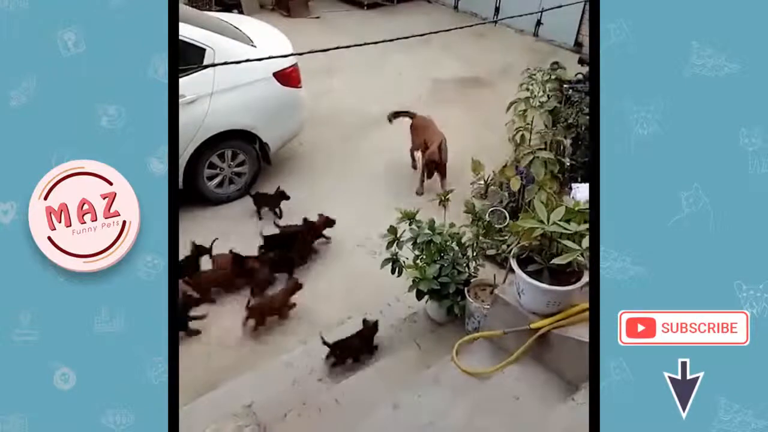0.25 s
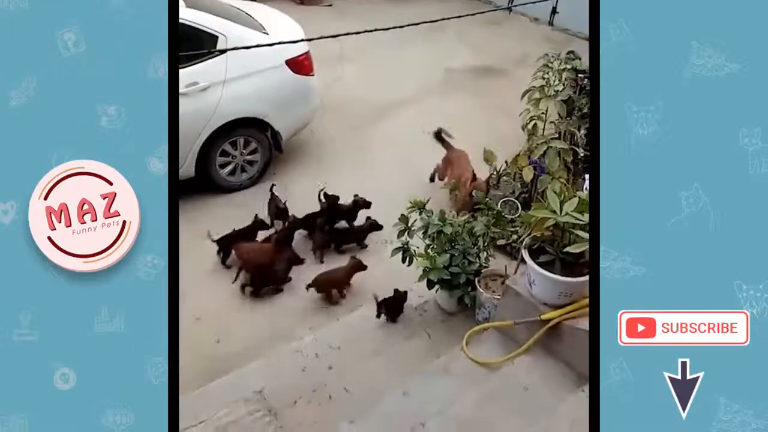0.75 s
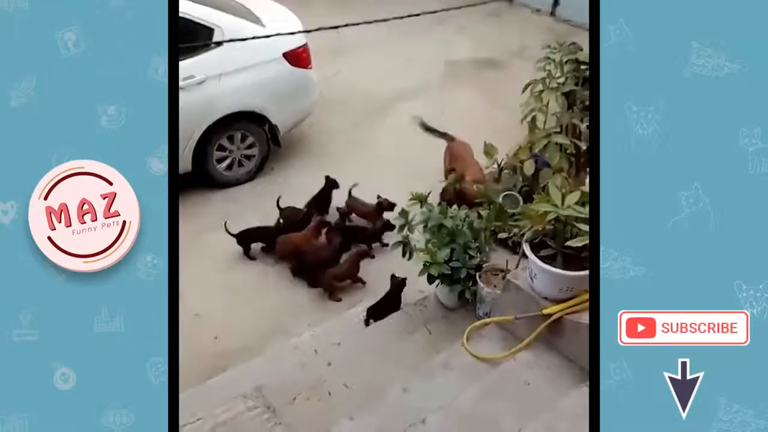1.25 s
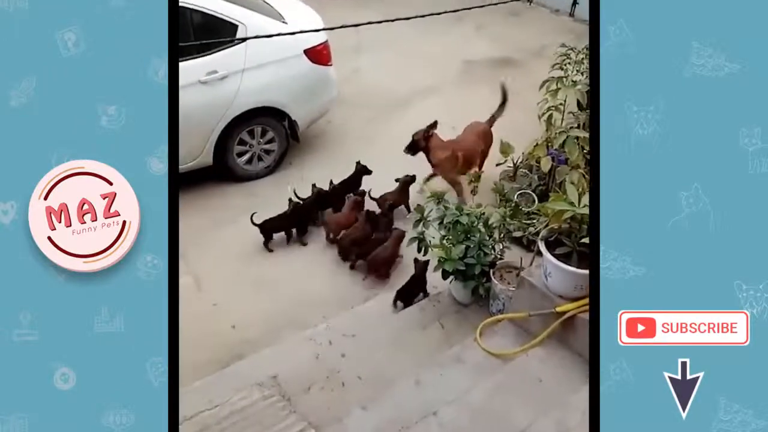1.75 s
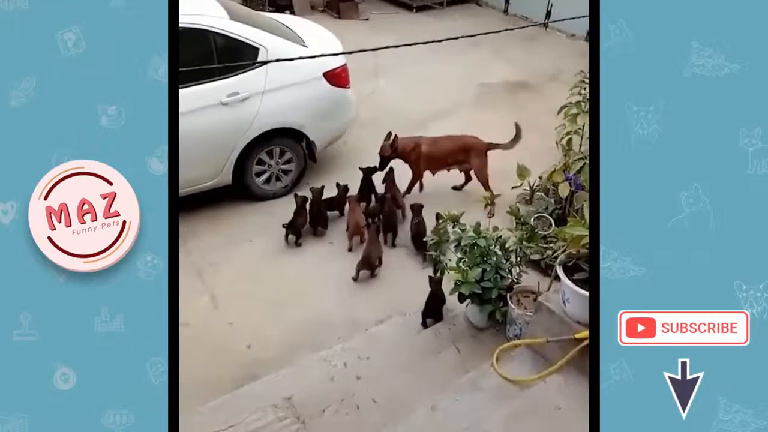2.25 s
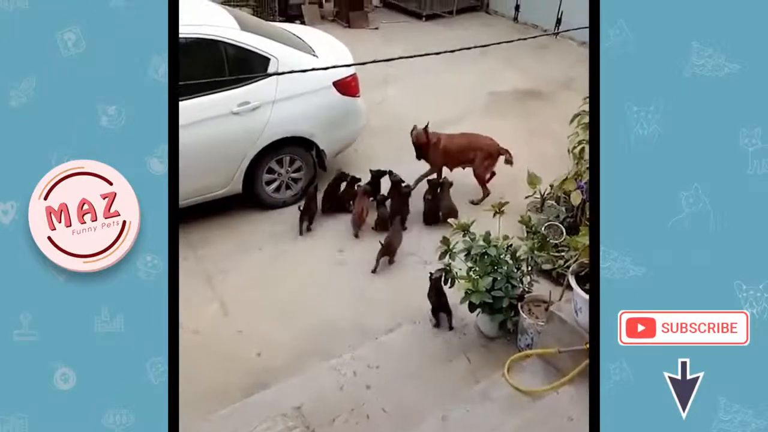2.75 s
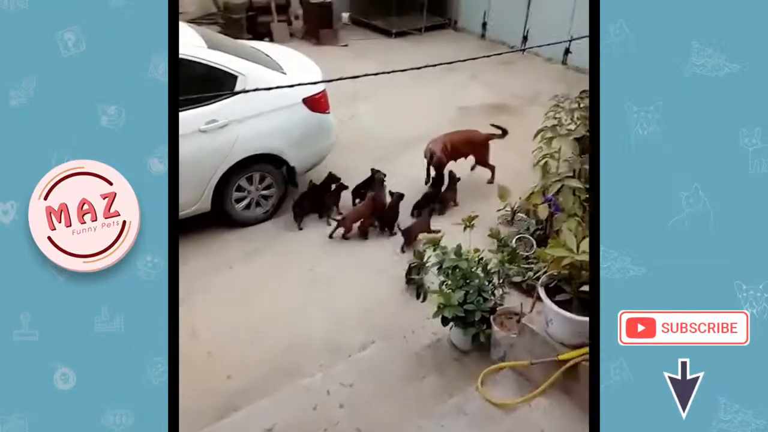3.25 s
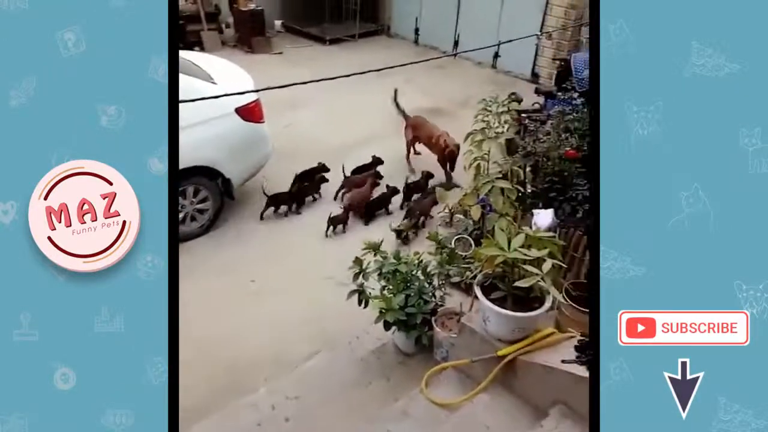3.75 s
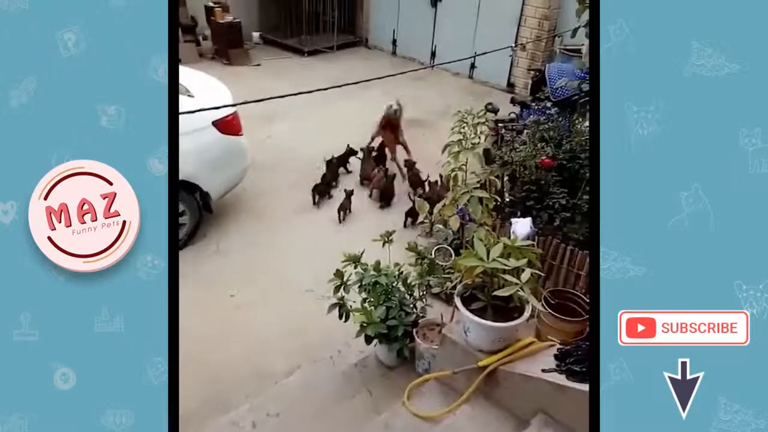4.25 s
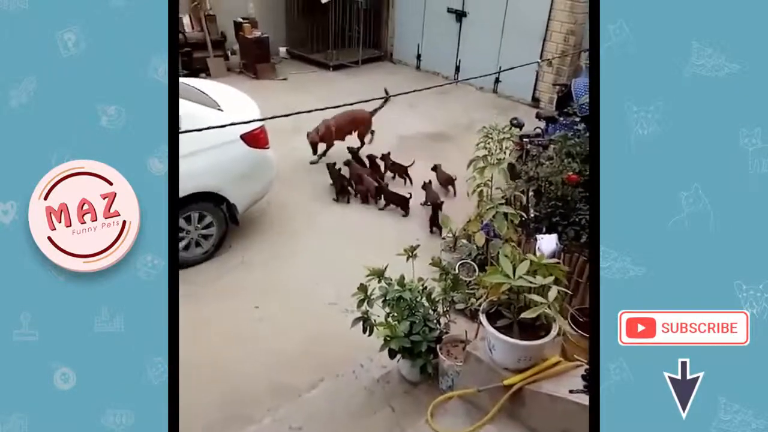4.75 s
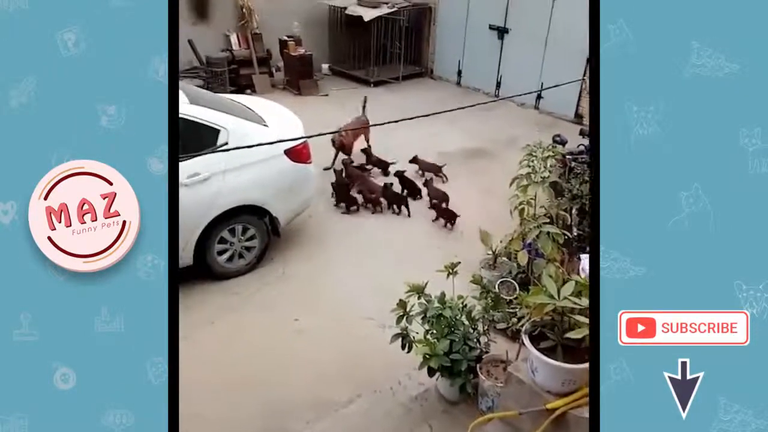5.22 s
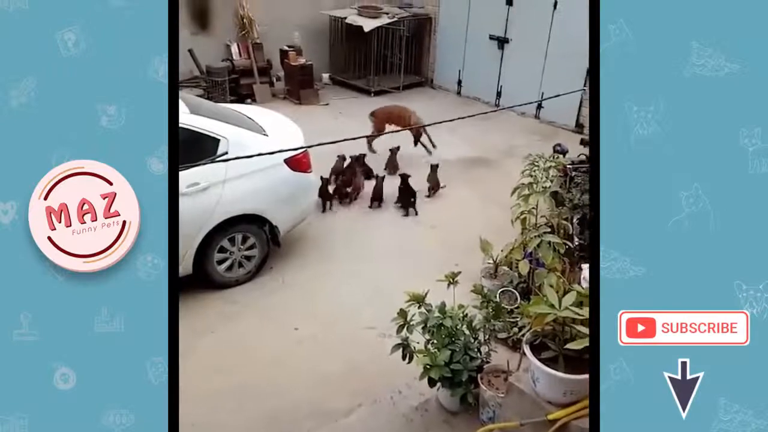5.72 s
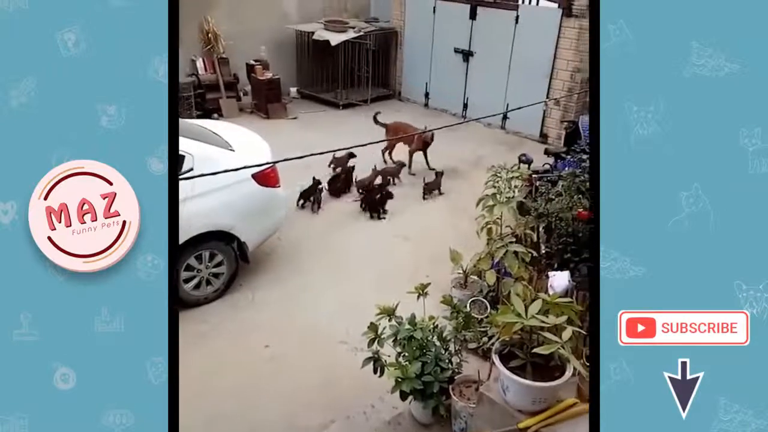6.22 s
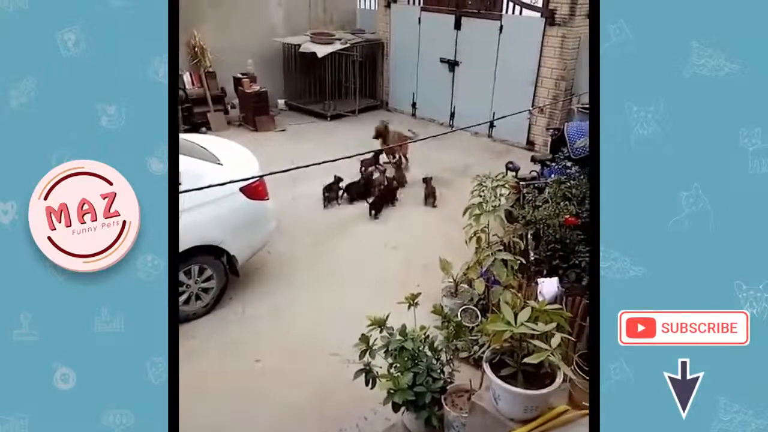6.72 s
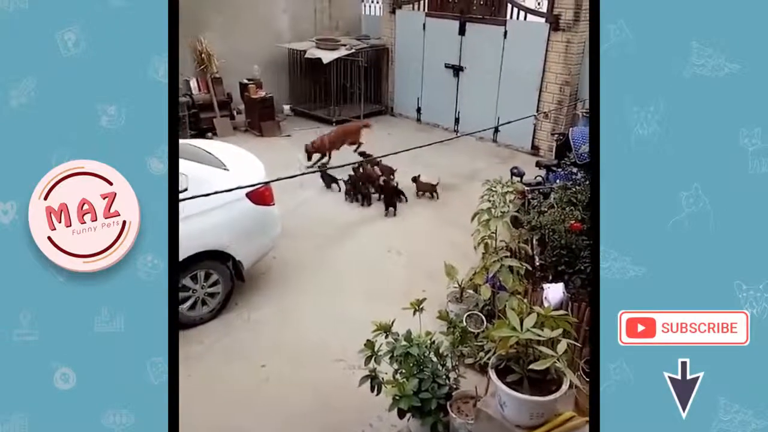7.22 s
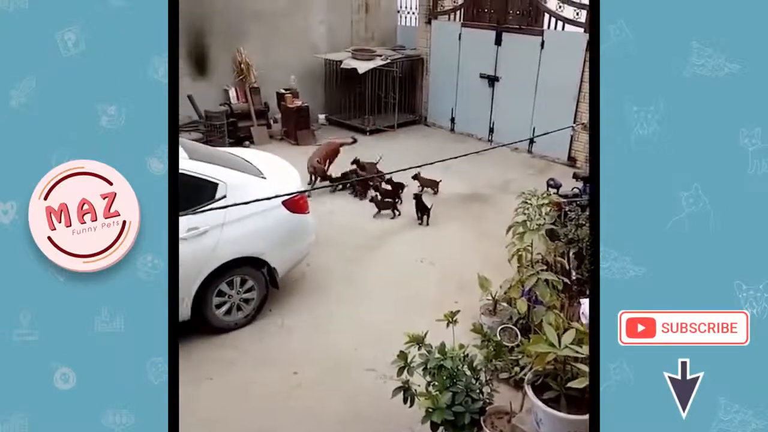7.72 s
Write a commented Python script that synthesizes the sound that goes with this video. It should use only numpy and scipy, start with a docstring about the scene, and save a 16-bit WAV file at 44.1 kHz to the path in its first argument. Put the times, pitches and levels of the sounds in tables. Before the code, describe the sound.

A litter of puppies yelps, whines and barks hoarsely in an overlapping chorus in a walled concrete yard, with wind thumps at the start.

```python
"""A litter of puppies crowds its mother in a walled concrete yard: hoarse barks start as a clean rising
chirp, then roughen with pitch jitter, a slower beat and breath noise. Clear open-mouthed yelps, closed-mouth
whines and thin whistling squeaks overlap as gliding tones; the mother hums low. More pups call behind them.
The walls answer with a short noise tail, wind noise and slaps thump the phone's microphone, hardest at
the start, and a faint hiss of yard air runs throughout."""
import sys
import numpy as np
from scipy import signal
from scipy.fft import rfft, irfft, next_fast_len
from scipy.io import wavfile
from scipy.ndimage import uniform_filter1d, minimum_filter1d, map_coordinates

SR = 44100
rng = np.random.default_rng(int(sys.argv[2]) if len(sys.argv) > 2 else 0)


def inscribe(sig):
    """Save sig as 16-bit PCM at rate SR to the path in sys.argv[1].

    A 1-D sig is mono; a 2-D sig holds one channel per row.
    Samples are clipped to [-1, 1] before scaling.
    """
    pcm = np.round(np.clip(np.atleast_2d(sig).T, -1, 1) * 32767)
    wavfile.write(sys.argv[1], SR, pcm.astype(np.int16))


def level_to_linear(level):
    """Convert decibel levels to linear amplitude factors, elementwise."""
    exponent = np.asarray(level, float) / 20
    return 10 ** exponent


N = 351477  # samples in the scene

# Voices: level_db is ahead of the mouth, throat and yard; brightness_db is treble tilt [dB per two octaves].
# hoarse barks: start_s, length_s, held_pitch_hz, level_db, hoarseness [no unit], brightness_db
BARK_CALLS = [(-.06, 0.083, 1085, -11, 0.87, 2), (0.601, 0.11, 1163, -23.5, 0.93, -0.5),
              (1.267, 0.11, 851, -15, 0.9, 0.5), (1.679, 0.11, 875.5, -18, 0.91, 0),
              (1.943, 0.089, 1053, -15, 1.4, 2.5), (2.144, 0.097, 1071, -19, 1, 2),
              (2.349, 0.11, 1000, -18.5, 1.2, 3.5), (2.521, 0.065, 1010, -23, 1.1, -4.5),
              (2.781, 0.1, 986, -18, .85, 3.5), (3.04, 0.1, 989, -21.5, 0.77, 3.5),
              (3.285, 0.11, 1021, -16.5, 1.185, 2), (3.519, 0.11, 1048, -16.5, 1.2, 2),
              (3.717, 0.11, 1033, -19.5, 1.1, 3.5), (4.043, 0.094, 976.1, -19, 0.78, 2),
              (4.22, 0.08, 1047, -21.5, 1.1, 4), (4.556, 0.1, 942, -24, 0.71, 4),
              (4.664, 0.111, 918, -21.5, 1.2, 1.5), (4.874, 0.11, 1075, -21.5, .7, 1),
              (5.079, 0.11, 1054, -19.5, 1.2, 3.5), (5.31, 0.1, 1097, -18, 1.1, 1),
              (5.524, 0.12, 984, -19.5, 0.77, 3.5), (5.714, 0.099, 1035, -16.5, 1.3, 0),
              (5.988, 0.13, 994, -19.5, .85, 2), (6.395, 0.2, 977, -20, 1, 2),
              (6.814, 0.12, 963, -22.5, 0.71, 1.5), (6.932, 0.16, 968, -20.5, 1, 1),
              (7.26, 0.094, 1164, -20.5, 0.75, 2), (7.437, 0.11, 1196, -17, 1.3, 2.5),
              (7.749, 0.1, 1076, -20.5, 0.69, 1), (7.905, 0.0754, 1086, -19, 1.2, 4.5)]
# closed-mouth whines: start_s, length_s, first_pitch_hz, last_pitch_hz, level_db
WHINE_CALLS = [(0, 0.037, 1321, 1266, -20.5), (0, 0.06, 958, 1190, -26), (.095, 0.07, 1438, 1241, -22.5),
               (.252, 0.014, 2130, 2130, -25.5), (.548, 0.058, 1760, 1927, -19),
               (.64, 0.08, 1954, 1813, -28.5), (.607, 0.078, 1202, 1096, -18),
               (.94, 0.021, 1193, 1109, -14), (1.01, 0.086, 1179, 929, -20.5),
               (1.39, 0.13, 1361, 1057, -16), (1.785, 0.06, 1186, 1238, -19.5),
               (1.9, 0.17, 1260, 1400, -29), (1.96, 0.038, 1049, 1068, -25.5),
               (2.01, 0.1514, 1262, 1330, -24), (2.225, 0.088, 1329, 1192, -14.5),
               (2.37, 0.1245, 1040, 1374, -20.5), (2.56, 0.29, 1484, 1251, -20),
               (2.61, 0.085, 1290, 1186, -26), (2.8, 0.094, 1007, 1317, -21.5),
               (2.92, 0.044, 1291, 1319, -20), (3, 0.1, 1222, 1049, -26.5),
               (3.03, 0.069, 1353, 1440, -26.5), (3.16, 0.11, 1254, 1158, -21.5),
               (3.36, 0.1, 1182, 1358, -20), (3.54, 0.2035, 1098, 1270, -25),
               (3.62, 0.09, 1293, 1475, -30.5), (3.74, 0.15, 1007, 1168, -26),
               (4.24, 0.0886, 1039, 1197, -22), (4.41, 0.049, 1032, 1240, -23.5),
               (4.515, 0.065, 1484, 1297, -28.5), (4.71, 0.0935, 1085, 1172, -26.5),
               (4.905, 0.088, 1013, 1134, -28.5), (4.95, 0.0332, 1370, 1316, -24),
               (5.18, 0.054, 1140, 1173, -25.5), (5.2, 0.068, 1415, 1376, -31.5),
               (5.32, 0.096, 1040, 1197, -23), (5.395, 0.12, 1263, 1219, -20.5),
               (5.74, 0.18, 1106, 1324, -25), (5.92, 0.15, 1469, 1256, -26),
               (6.32, 0.076, 1307, 1297, -32.5), (6.5, 0.1566, 1043, 1236, -31),
               (6.835, 0.25, 1177, 1350, -24.5), (7.02, 0.038, 1184, 1422, -18),
               (7.275, 0.079, 1080, 1278, -30), (7.385, 0.059, 1316, 1318, -20.5)]
# clear open-mouthed yelps: start_s, length_s, first_pitch_hz, last_pitch_hz, level_db, brightness_db
YELP_CALLS = [(.05, 0.053, 1203, 1393, -26.5, 1), (.105, 0.067, 1423, 1226, -23, 3),
              (.33, 0.19, 1015, 827, -40, 4), (.497, .1, 861, 982, -17, 4),
              (.866, .084, 778, 1030, -17, 0.5), (.945, 0.15, 1153, 1025, -29.5, 3),
              (1.4, 0.14, 1308, 1084, -31.5, 1), (1.51, 0.15, 936.7, 957, -24, 14.5),
              (2.04, 0.088, 1358, 1143, -15, 2.5), (2.12, 0.11, 820, 1115, -21, -0.5),
              (2.51, 0.1, 815, 1090, -23, 0), (2.28, 0.08, 1320, 1070, -27.5, -1),
              (2.84, 0.12, 1337, 1224, -23, -0.5), (2.91, 0.099, 900, 1007, -31, -4),
              (3.063, .12, 1090, 1194, -25, -6), (3.17, .105, 1250, 1102, -25, 1),
              (3.46, 0.13, 1075, 1076, -25.5, -2.5), (3.6, 0.063, 1170, 1170, -18.5, 3),
              (3.91, 0.16, 1460, 1480, -47.5, 9.5), (4.08, .13, 960, 1181, -22, 2),
              (4.41, 0.084, 1100, 1141, -24, 0.5), (4.455, 0.0755, 975, 994.6, -26, 0),
              (4.82, 0.098, 1130, 1152, -28.5, 1.5), (4.985, 0.09, 855, 985, -25.5, 1),
              (5.61, 0.067, 1120, 1323, -24, -4), (5.815, 0.083, 1128, 1175, -22, 0),
              (6.12, 0.15, 972, 1065, -33, -2), (6.45, 0.17, 923, 934, -26, 1),
              (6.82, 0.09, 1104, 1198, -24, 4.5), (7, 0.16, 985, 1080, -40, -6.5),
              (7.885, 0.076, 930, 953, -26.5, -4), (7.81, 0.24, 1036, 1217, -35, 0)]
# whistling squeaks: start_s, length_s, first_pitch_hz, last_pitch_hz, level_db
SQUEAK_CALLS = [(.87, 0.041, 10750, 10550, -50), (1.44, 0.2, 7630, 7120, -44),
                (2.22, 0.15, 7300, 7420, -36.5), (2.57, 0.11, 10670, 10070, -45),
                (2.89, 0.055, 11050, 11280, -36.5), (2.99, 0.12, 7900, 7340, -42),
                (3.4, 0.0412, 11000, 11940, -36), (3.41, 0.098, 7960, 7640, -32),
                (3.785, 0.028, 11300, 11500, -42), (4.13, 0.067, 7104, 7240, -35),
                (5, 0.15, 7380, 7130, -42), (5.41, 0.036, 7200, 7450, -34),
                (5.645, 0.029, 11670, 10800, -41.5), (6.5, 0.05, 7200, 7000, -38),
                (5.2, 0.058, 11700, 12670, -46.5), (6.09, 0.08, 11600, 11950, -53.5)]
# the mother's hums: start_s, length_s, first_pitch_hz, last_pitch_hz, level_db
HUM_CALLS = [(3.72, 0.15, 395, 439, -45.5), (6.45, 0.19, 426, 366, -52), (6.71, 0.22, 565, 497, -55)]
# open throat and microphone response: frequency_hz, gain_db
THROAT_AND_MICROPHONE = [(600, -22), (820, -6.5), (1200, 7), (1700, 7), (2300, 3), (2900, 3.5), (3600, 0),
                         (5500, 1.5), (6600, -4), (7400, -21.5), (8300, -57)]
# harmonics of a whine, from the fundamental up: mean level_db
WHINE_HARMONICS_DB = [1, -22, -12.5, -24.5, -30.5]
# reverberation of the walled yard: frequency_hz, decay_s [time to fall 60 dB]
YARD_DECAY = [(800, 0.76), (2000, 0.5804), (6000, 0.44)]
# gusts on the microphone port: peak_s, width_s [between the 1/e points], level_db
WIND_GUSTS = [(0.136, 0.099, -13), (0.371, 0.308, -18), (0.693, 0.051, -35.5), (0.817, 0.078, -16),
              (0.938, 0.2, -24.5), (1.185, 0.12, -27), (1.67, 0.095, -27), (1.846, 0.2, -46),
              (2.153, 0.65, -56.5), (2.804, 0.32, -42.5), (2.92, 0.11, -33.5), (3.149, 0.14, -32.5),
              (3.314, 0.081, -35.5), (4.382, 0.077, -45.5), (4.682, 0.13, -45.5)]
# colour of the wind buffeting: frequency_hz, relative gain_db
WIND_COLOUR = [(15, -65.5), (30, -33), (62, 3.5), (97, 1.5), (151, -4.5), (348, -23.5), (600, -36.5),
               (780, -65.5), (1320, -120)]
# gust slaps: start_s, drive_db [of the ringing, ahead of its rise and decay]
WIND_SLAPS = [(0.069, 6), (0.12, 2.5), (0.166, 15.5), (0.808, 5)]
# colour of the yard hiss: frequency_hz, relative gain_db
AIR_COLOUR = [(30, -11), (120, -3), (700, -7), (1200, -9), (6500, -19), (7800, -40), (11000, -31),
              (13500, -33)]


def unit(x):
    """Scale to rms 1."""
    return x / np.sqrt(np.mean(x ** 2) + 1e-20)


def along(points, hz):
    """Read (Hz, value) points on a log frequency axis."""
    f, v = np.transpose(points)
    return np.interp(np.log(hz + 1), np.log(f + 1), v)


def wobble(rate, size):
    """A smooth random curve through `rate` normal random knots a second."""
    at = np.arange(0, size + 32, 32)  # computed every 32 samples, straight lines between
    knots = rng.standard_normal(int(size * rate / SR) + 4)
    return np.interp(np.arange(size), at, map_coordinates(knots, [at * rate / SR]))


def coloured(x, spectrum):
    """Pass x through the gain of (Hz, dB) points."""
    padded = next_fast_len(N + 8192)
    gain = level_to_linear(along(spectrum, np.fft.rfftfreq(padded, 1 / SR)))
    return irfft(rfft(x, padded) * gain, padded)[:N]


def add(track, s, x):
    """Mix x in at time s, cutting whatever lies outside the track."""
    i = max(round(s * SR), 0)
    x = x[max(-round(s * SR), 0):]
    track[i:i + len(x)] += x[:max(len(track) - i, 0)]


def swell(size, rise_s, fall_s):
    """A breath: smooth rise, hold, smooth fall."""
    t = np.arange(size) / SR
    return np.sin(np.pi / 2 * np.clip(np.minimum(t / rise_s, t[::-1] / fall_s), 0, 1)) ** 2


def mouth(x, brightness_db):
    """A wider mouth lifts the treble and moves its resonance up."""
    resonance_hz, depth_db, width_octaves = 3600, 7, .25
    moved = .17 * brightness_db  # octaves
    octaves = np.log2(np.clip(np.fft.rfftfreq(len(x), 1 / SR), 1500, 6500) / resonance_hz)
    bump = np.exp(-((octaves - moved) / width_octaves) ** 2) - .5
    peak_db = depth_db * bump * (octaves > -1.2)  # leaves the lowest frequencies alone
    return irfft(rfft(x) * level_to_linear(brightness_db * octaves / 2 + peak_db), len(x))


def calls(rows, harmonics_db, arch, shake, shake_rate, flutter_db, rise_s, fall_s):
    """Tonal calls: pitch glides from first to last with a mid-call lift, trembles, and the level flutters.

    arch and shake are shares of the pitch; shake_rate is in knots a second."""
    out = np.zeros(N)
    for s, length, first, last, db, *brightness in rows:
        size = round((length + fall_s / 2) * SR)
        progress = np.minimum(np.arange(size) / SR / length, 1)
        hz = (first + (last - first) * progress) * (1 + arch * np.sin(np.pi * progress))
        phase = 2 * np.pi * np.cumsum(hz * (1 + shake * wobble(shake_rate, size))) / SR
        tone = np.zeros(size)
        for k, harmonic_db in enumerate(harmonics_db):
            spread_db = np.sign(k) * rng.normal(0, 2)  # overtones differ from call to call
            level = level_to_linear(harmonic_db + spread_db + 3.5 * wobble(45, size))
            tone += level * np.sin((k + 1) * phase + k * k)
        voice = mouth(swell(size, rise_s, fall_s) * tone, sum(brightness))
        level = level_to_linear(db + flutter_db * wobble(71.2, size))
        add(out, s, level * np.sqrt(2) * voice)
    return out


def crowd(count, low_hz, high_hz, db):
    """Rows of chance calls, each following a randomly picked bark, from the third bark on, by up to 0.14 s."""
    which, wait, length, pitch, bend, level = rng.random((count, 6)).T
    leaders = np.array(BARK_CALLS[2:])
    start_s = leaders[(which * len(leaders)).astype(int), 0] + .14 * wait
    top = low_hz + (high_hz - low_hz) * pitch
    first_hz = top * (.8 + .16 * bend)
    last_hz = top * (1.02 - .16 * level)  # quieter calls end lower
    return np.transpose([start_s, .05 + .1 * length, first_hz, last_hz, db - 8 * level])


def barks():
    """The folds start on a regular rising cycle, then roughen: jitter, a beating second rhythm, gated breath."""
    scoop, scoop_s, climb_per_s = .22, .017, .3  # start this share low, close in at this pace, creep up
    harmonics_db = [-4, -8, 3, 0, 3, 0, 0, 0]
    out = np.zeros(N)
    for s, length, held, db, hoarse, brightness in BARK_CALLS:
        size = round((length + 0.038) * SR)
        t = np.arange(size) / SR
        onset_s = .035 + .06 * np.clip(1.2 - hoarse, 0, 1)  # hoarser barks roughen sooner
        chaos = np.clip(hoarse, .6, .85) * np.clip(t / onset_s, 0, 1) ** 2
        hz = held * (1 - scoop * np.exp(-t / scoop_s)) * (1 + climb_per_s * t)
        rough_jitter = chaos ** 2 * (.04 * wobble(160, size) + .015 * wobble(30, size))
        hz = hz * (1 + .006 * wobble(200, size) + rough_jitter)
        phase = 2 * np.pi * np.cumsum(hz) / SR
        pulses = np.zeros(size)
        for k, harmonic_db in enumerate(harmonics_db, 1):
            pulses += level_to_linear(harmonic_db + 4 * wobble(55, size)) * np.cos(k * phase + k * k)
        # the second rhythm beats at a fraction of the pitch
        second = np.cos(phase * rng.uniform(.15, .5) + 1.5 * wobble(120, size))
        pulses = unit(pulses * (1 + 1.1 * chaos * second))
        breath = unit((2.0 + np.cos(phase)) * rng.standard_normal(size))  # pulsed by each cycle
        airy = .33 * chaos ** 3  # breath's share of the power
        voice = np.sqrt(1 - airy) * pulses + np.sqrt(airy) * breath
        shaped = mouth(swell(size, .36 * length, .07) * voice, brightness)
        add(out, s, level_to_linear(db + 1.88 * wobble(60.5, size)) * shaped)
    return out


def whines():
    """With the mouth closed the fundamental dominates and the overtones stay weak."""
    return calls(WHINE_CALLS, WHINE_HARMONICS_DB, arch=.034, shake=.015, shake_rate=70,
                 flutter_db=2.5, rise_s=.02, fall_s=.04)


def yard(x):
    """Walls and concrete answer after 500 samples; each frequency dies at its own speed."""
    hz, t, z = signal.stft(rng.standard_normal(SR // 2), SR, nperseg=256)
    decay = level_to_linear(-60 * t / along(YARD_DECAY, hz)[:, None])
    tail = signal.istft(z * decay, SR, nperseg=256)[1]
    return signal.fftconvolve(np.pad(x, (500, 0)), tail / np.linalg.norm(tail))[:N]


def wind():
    """Lumpy low turbulence on the microphone port, with a few sharp slaps that ring and die at once."""
    clock = np.arange(N) / SR
    strength = np.full(N, level_to_linear(-87))  # the lull between gusts
    for peak_s, width_s, db in WIND_GUSTS:
        strength += level_to_linear(db) * np.exp(-(2 * (clock - peak_s) / width_s) ** 2)
    lumps = level_to_linear(5.77 * wobble(30, N)) * rng.standard_normal(N)
    out = strength * unit(coloured(lumps, WIND_COLOUR))
    t = np.arange(SR // 20) / SR
    slap = -np.sin(2 * np.pi * 140 * t) * (1 - np.exp(-t / .0012)) * np.exp(-t / .0035)
    for s, db in WIND_SLAPS:
        add(out, s, level_to_linear(db) * slap)
    return out


def yard_air():
    """A steady coloured hiss whose level drifts slightly."""
    hiss = unit(coloured(rng.standard_normal(N), AIR_COLOUR))
    return level_to_linear(-54.0 + 0.39 * wobble(2.4, N)) * hiss


def yelps():
    """An open mouth lets a full row of harmonics out over a clean, gliding pitch."""
    return calls(YELP_CALLS, [-9, -15] + [-7] * 6, arch=.03, shake=.008, shake_rate=150,
                 flutter_db=3, rise_s=.04, fall_s=.03)


def squeaks():
    """Whistles are single high tones without overtones; fainter chance ones join the listed squeaks."""
    faint = crowd(count=60, low_hz=9730, high_hz=14800, db=-58)
    return calls([*SQUEAK_CALLS, *faint], [0], arch=0, shake=.0071, shake_rate=150,
                 flutter_db=8.2, rise_s=.0014, fall_s=.0088)


def pups_behind():
    """Chance calls from the rest of the litter, rich in harmonics and abrupt at both ends."""
    rows = crowd(count=50, low_hz=900, high_hz=1398.0, db=-28.0)
    return calls(rows, [-7] * 8, arch=.07, shake=.01, shake_rate=90,
                 flutter_db=4.1, rise_s=.002, fall_s=.006)


def mother_hums():
    """Larger folds hum low, with three harmonics and a slow tremble."""
    return calls(HUM_CALLS, [0, -8, -14], arch=.02, shake=.021, shake_rate=9,
                 flutter_db=5.5, rise_s=.044, fall_s=.27)


def scene():
    """Pups and mother in the yard, the walls' answer, wind and air at the microphone."""
    open_mouths = coloured(level_to_linear(2.5) * barks() + yelps() + pups_behind(), THROAT_AND_MICROPHONE)
    dogs = open_mouths + whines() + squeaks() + mother_hums()
    return (dogs + level_to_linear(-5.5) * yard(dogs) + wind() + yard_air())[None]


def roll_off(x):
    """The treble ends steeply here."""
    return signal.sosfilt(signal.butter(12, 13840, fs=SR, output="sos"), x)


def record(dry):
    """The phone's limiter ducks the loudest peaks, easing the gain down and up around each."""
    needed = np.minimum(1, .85 / (np.abs(dry) + 1e-9))
    gain = uniform_filter1d(minimum_filter1d(needed, size=600), size=500)  # windows in samples
    return roll_off(dry * gain)


dry = scene()
out = record(dry)
inscribe(out)
```